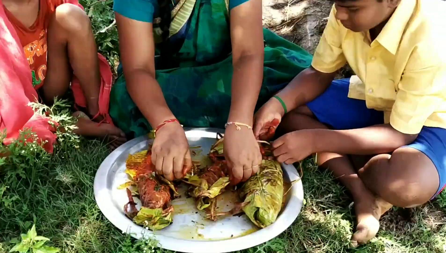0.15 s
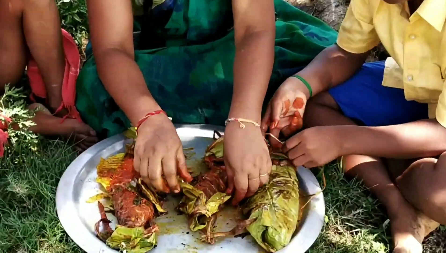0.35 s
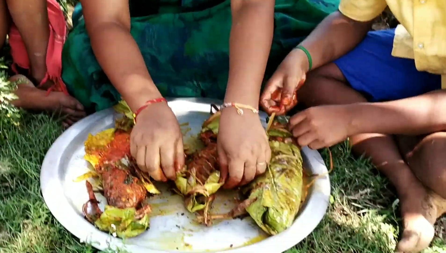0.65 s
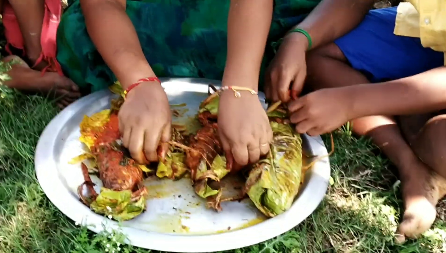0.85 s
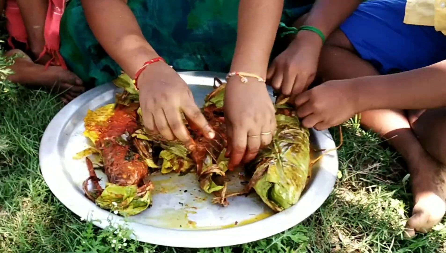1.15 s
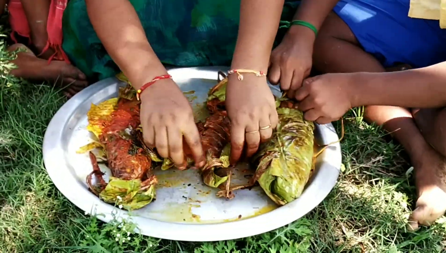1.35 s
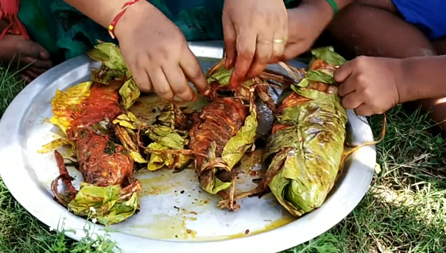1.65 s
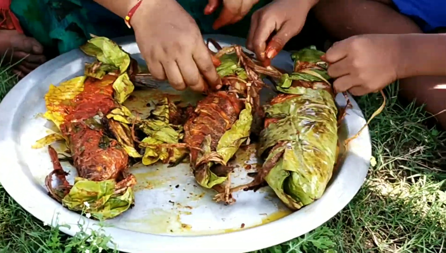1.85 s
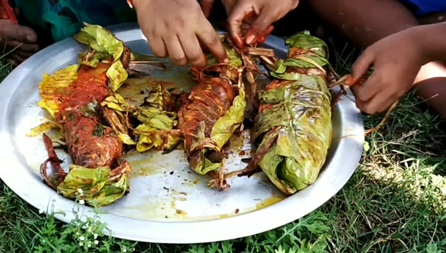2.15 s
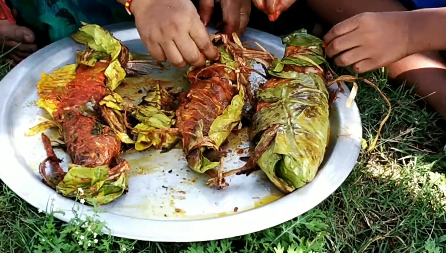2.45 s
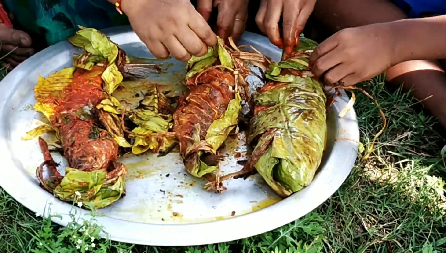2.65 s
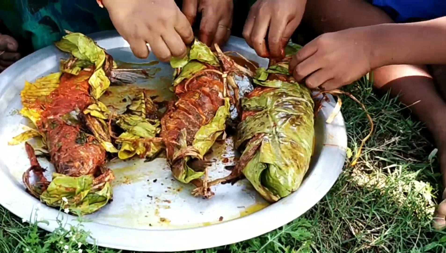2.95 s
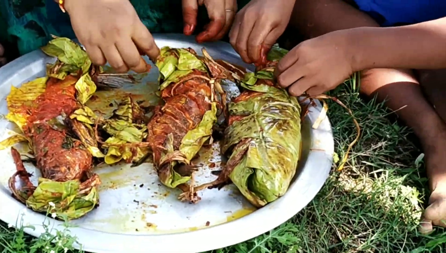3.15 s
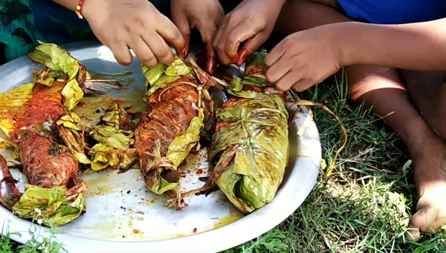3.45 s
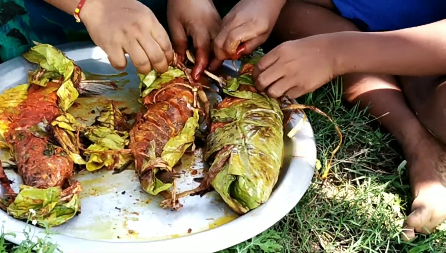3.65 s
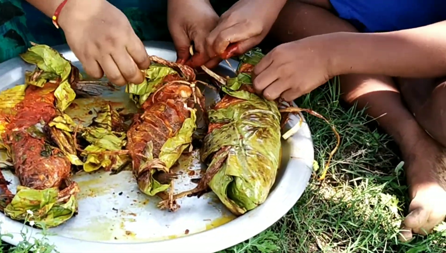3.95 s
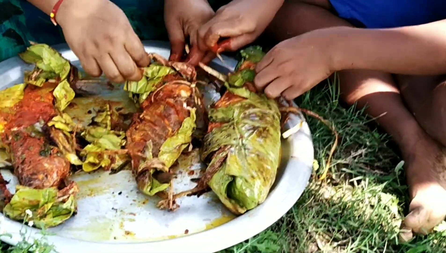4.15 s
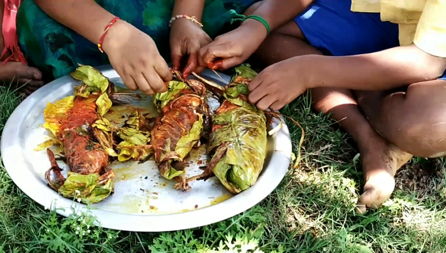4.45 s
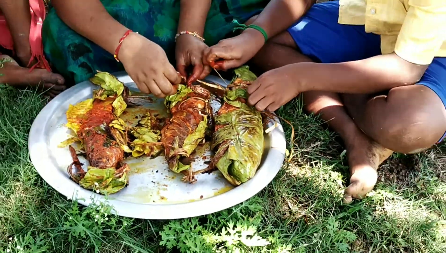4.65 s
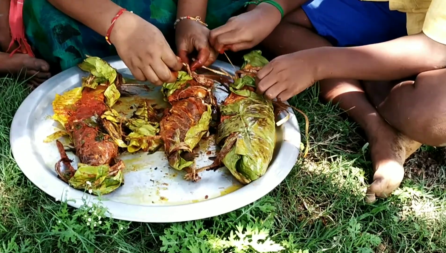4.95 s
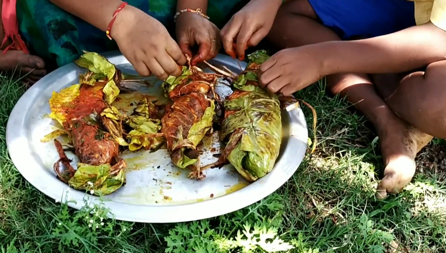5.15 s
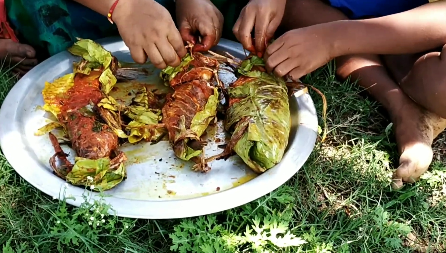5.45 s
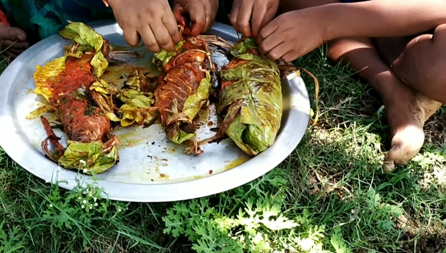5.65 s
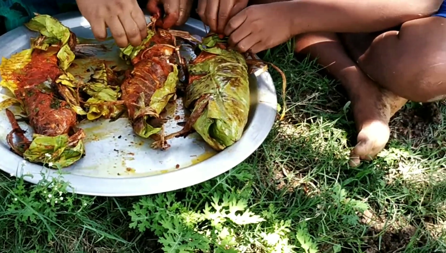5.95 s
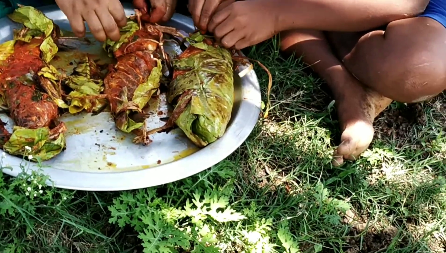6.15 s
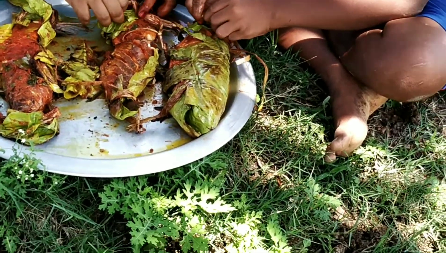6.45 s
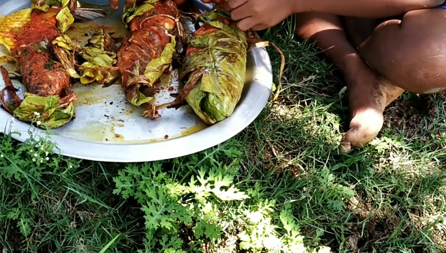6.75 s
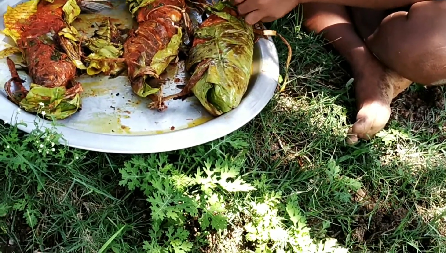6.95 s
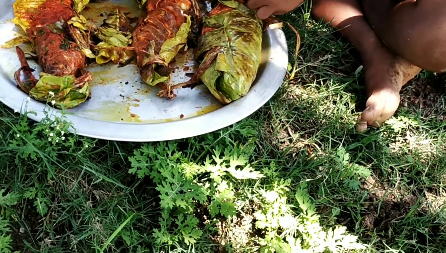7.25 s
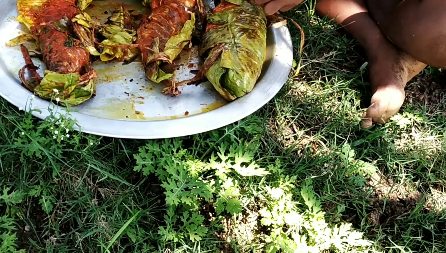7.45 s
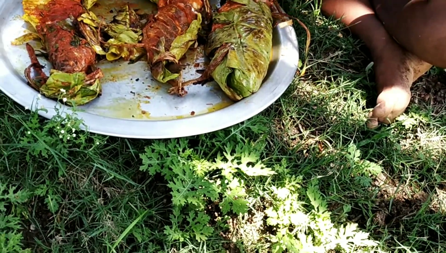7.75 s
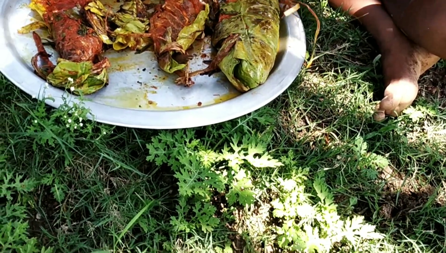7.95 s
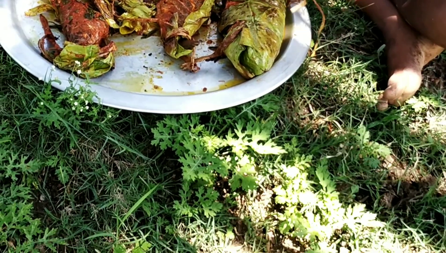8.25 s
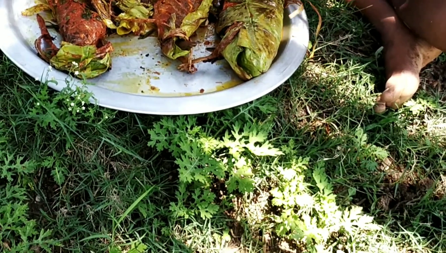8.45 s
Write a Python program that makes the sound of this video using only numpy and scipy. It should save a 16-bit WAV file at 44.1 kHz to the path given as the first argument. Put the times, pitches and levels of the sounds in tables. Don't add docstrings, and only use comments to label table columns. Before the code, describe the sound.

Outdoors on grass, a nearby cricket to the left gives short ringing trills about every 0.4 seconds, pausing slightly longer around six seconds. Low wind buffets a hand-held stereo microphone, growing strongest near seven seconds. Finger knocks and brief rubs hit its left side early, at four seconds and near the end. Small leaf snaps, faint bird whistles and distant crows sit over soft rustle and hiss.

```python
import sys
import numpy as np
from scipy import signal
from scipy.fft import rfft, irfft, next_fast_len
from scipy.io import wavfile
from scipy.ndimage import uniform_filter1d

SR = 44100
rng = np.random.default_rng(int(sys.argv[2]) if len(sys.argv) > 2 else 0)


def store_pcm(level_fs):
    pcm = np.round(np.clip(level_fs, -1, 1) * 32767).astype(np.int16)
    wavfile.write(sys.argv[1], SR, np.atleast_2d(pcm).T)


def attenuation_scalar(level_db):
    decades = np.asarray(level_db, float) / 20
    return 10 ** decades


N = 380009


def shaped(points, size):
    hz, db = np.transpose(points)
    fast = next_fast_len(size)
    bins_hz = np.arange(fast // 2 + 1) * SR / fast + 1e-3
    gain = attenuation_scalar(np.interp(np.log(bins_hz), np.log(hz), db))
    x = irfft(rfft(rng.standard_normal(fast)) * gain, fast)[:size]
    return x / x.std()


def walk(rate_hz, size=N):
    k = int(SR / rate_hz)
    held = np.repeat(rng.standard_normal(size // k + 1), k)
    return 1.64 * uniform_filter1d(uniform_filter1d(held, k), k)[:size]


def band(x, low_hz, high_hz, order=2):
    return signal.lfilter(*signal.butter(order, [low_hz, min(high_hz, .45 * SR)], "band", fs=SR), x)


def add(out, s, sound):
    i = int(s * SR)
    sound = sound[..., :N - i]
    out[..., i:i + sound.shape[-1]] += sound


def sides(left_db, right_db):
    return attenuation_scalar(np.array([[left_db], [right_db]]))


def field():
    # (frequency [Hz], left density [dB], right density [dB])
    spectrum = [(104, 5.5, 1), (437, 6, 3), (1310, -2.5, -1), (2000, -1, 1), (8000, -1.5, -4.5),
                (12000, -10, -8), (15500, -10.5, -15.5), (16000, -50, -47)]
    # (time [s], level [dB])
    rustle = [(0, -67.5), (1.8, -68), (3.0, -70.5), (6.0, -70.5), (8.62, -69.5)]
    stir_db = np.interp(np.arange(N) / SR, *np.transpose(rustle))
    out = np.zeros((2, N))
    for port in range(2):
        rest = shaped(np.array(spectrum)[:, [0, port + 1]], N)
        for top_hz in [1200, 2400, 4200, 6500, 9000, 12000]:
            low_pass = signal.butter(2, top_hz, fs=SR)
            low = signal.lfilter(*low_pass, rest)
            octave = signal.lfilter(*low_pass, low[::-1])[::-1]
            out[port] += octave * attenuation_scalar(2.0 * walk(13))
            rest = rest - octave
        out[port] += rest * attenuation_scalar(1.0 * walk(23))
        out[port] *= attenuation_scalar(stir_db + .5 * walk(1.52) + 9.5)
    return out


def whistles():
    # (time [s], length [s], start [Hz], end [Hz], near-port level [dB])
    right_bird = [(2.69, .055, 2750, 2300, -61), (3.063, 0.055, 2680, 2350, -60),
                  (3.46, 0.068, 2620, 1800, -61), (3.665, 0.06, 2540, 1900, -61),
                  (3.855, 0.052, 2490, 2150, -63), (4.049, 0.058, 2580, 2100, -61),
                  (4.13, 0.1, 2850, 2920, -70), (4.25, 0.056, 2540, 2250, -65),
                  (4.45, 0.03, 2570, 2400, -68), (6.95, .1, 1720, 1800, -73)]
    # (time [s], length [s], start [Hz], end [Hz], near-port level [dB])
    left_bird = [(4.885, 0.085, 3980, 4350, -71.5), (8.272, .08, 1900, 2300, -68),
                 (8.37, 0.03, 2350, 2680, -65), (8.4, .045, 2480, 2640, -66), (8.555, .04, 1950, 1800, -70)]
    right_shadow_db, left_shadow_db, swoop_hz = -15, -7, 171
    out = np.zeros((2, N))
    placed = [(row, sides(right_shadow_db, 0)) for row in right_bird]
    placed += [(row, sides(0, left_shadow_db)) for row in left_bird]
    for (s, length, start_hz, end_hz, db), place in placed:
        u = np.arange(int(length * SR)) / (length * SR)
        falling = end_hz < start_hz
        pitch_hz = start_hz + (end_hz - start_hz) * u ** (3.5 if falling else .7)
        pitch_hz += swoop_hz * (np.exp(-u / .15) - .6) * falling
        pitch_hz += 15 * walk(98, len(u))
        tone = np.sin(2 * np.pi * np.cumsum(pitch_hz) / SR)
        envelope = np.sin(np.pi * u) ** 0.1 * (1 - 0.13 * u ** 2)
        add(out, s, 1.35 * tone * envelope * attenuation_scalar(db) * place)
    return out


def caws():
    # (time [s], length [s], throat resonance [Hz], left level [dB], right level [dB])
    crow_calls = [(0.449, 0.21, 2050, -86, -60.5), (2.133, 0.22, 2790, -78, -65),
                  (2.453, 0.14, 1637, -76, -67), (2.42, 0.2, 1180, -75, -76), (2.55, 0.14, 2080, -74, -66),
                  (3.224, 0.067, 1910, -75, -64), (5.189, 0.23, 2190, -82, -66),
                  (5.19, 0.12, 1790, -82, -66), (5.699, 0.17, 2010, -83, -66),
                  (5.721, 0.14, 1500, -86, -76), (6.683, 0.16, 1735, -78, -71),
                  (7.241, 0.16, 1720, -78, -68), (8.49, 0.092, 1870, -72, -77),
                  (4.38, 0.14, 1250, -77, -79)]
    out = np.zeros((2, N))
    for s, length, throat_hz, left_db, right_db in crow_calls:
        u = np.arange(int(length * SR)) / (length * SR)
        bend = 1 + .05 * np.sin(np.pi * u ** .5) - .05 * u + .03 * walk(70, len(u))
        phase = np.cumsum(throat_hz / 4 * bend) / SR
        harmonics = sum(np.sin(2 * np.pi * k * phase) for k in range(1, 7))
        buzz = harmonics + 6 * rng.standard_normal((2, len(u)))
        caw = band(buzz, .88 * throat_hz, 1.1 * throat_hz)
        add(out, s, .85 * caw / caw.std() * np.sin(np.pi * u) ** .6 * sides(left_db, right_db))
    return out


def birds():
    decay = np.exp(-np.arange(4000) / (.025 * SR))
    trees = attenuation_scalar(-29) * rng.standard_normal((2, 4000)) * decay
    trees[:, 0] = 1
    return signal.fftconvolve(whistles() + caws(), trees, axes=1)[:, :N]


def wind():
    # (time [s], left level [dB], right level [dB], turbulence [dB])
    breeze = [(0, -41, -48.5, 4.5), (.42, -46, -49.5, 0), (.75, -40.5, -55, -4), (1.2, -47, -46, 1),
              (1.55, -49.5, -51.5, -1), (2.05, -43, -46, -7.5), (2.4, -50, -52.5, 2), (3.0, -40.5, -44, -1),
              (3.6, -44, -49.5, 8), (4.25, -37.5, -47, -0.5), (4.95, -43, -51, 3.5), (5.5, -43, -48, 4.5),
              (6.2, -40, -44, 0.5), (6.9, -31, -35, 3.5), (7.2, -26, -36.5, 2), (7.55, -42.5, -46, -4),
              (7.97, -31.5, -35.5, -4.5), (8.62, -47, -43.5, -2.5)]
    # (time [s], half length [s], port [0 left, 1 right], rise over breeze [dB])
    puffs = [(0.607, 0.093, 1, 11), (1.01, 0.038, 1, 9), (1.212, 0.29, 0, 3), (2.082, 0.1, 0, 6),
             (2.51, 0.12, 0, 1.5), (2.805, 0.3, 0, 2.5), (2.917, 0.14, 0, -9.5), (3.395, 0.23, 1, 10),
             (3.513, 0.073, 1, -22), (3.944, 0.05, 0, 5.5), (4.525, 0.082, 1, 1), (5.15, 0.11, 0, 2),
             (5.12, 0.066, 1, 8), (5.612, 0.11, 1, 13), (5.797, 0.14, 0, 1.5), (6.065, 0.1, 1, 8.5),
             (6.51, 0.073, 0, 5.5), (6.49, 0.35, 1, 2.5), (6.88, 0.055, 1, 10), (7.026, 0.068, 0, 0.5),
             (6.994, 0.2, 1, -5), (7.139, 0.13, 0, -9), (7.999, 0.1, 1, 10.5), (8.095, 0.17, 1, -6),
             (8.388, 0.22, 1, -10), (8.59, 0.23, 1, 8.5)]
    shelter_db, gusty_db, patchy_db = (0, -6), (1, 2.5), (3.5, 5)
    calm_flutter_db, calm_db = (-55, -64), -42
    flutter_per_db, puff_flutter_per_db = 1.3, 1.5
    s, *levels = np.transpose(breeze)
    t = np.arange(N) / SR
    *breeze_db, turbulence_db = [np.interp(t, s, c) for c in levels]
    puff_db = np.zeros((2, N))
    for mid, length, port, db in puffs:
        add(puff_db[round(port)], mid - length, db * np.hanning(int(2 * length * SR)))
    out = np.zeros((2, N))
    for port in range(2):
        shelter = shelter_db[port]
        rumble = shaped([(20, 2.0), (40, 1.5), (70, 4.0), (110, -3.0 + shelter / 2),
                         (160, -11.5 + shelter), (260, -30.5), (400, -63.5)], N)
        flutter = shaped([(90, -25), (140, -1.0), (190, -2), (300, -11.5), (450, -23.0),
                          (700, -35.0), (1200, -59.5)], N)
        out[port] = rumble * attenuation_scalar(breeze_db[port] + puff_db[port] + 6.5 + gusty_db[port] * walk(13))
        flutter_db = calm_flutter_db[port] + flutter_per_db * (breeze_db[port] - calm_db) + turbulence_db
        flutter_db += puff_flutter_per_db * puff_db[port] + 1.6
        out[port] += flutter * attenuation_scalar(flutter_db + patchy_db[port] * np.minimum(walk(30), 2))
    return out


def wind_pops():
    # (time [s], port [0 left, 1 right], level [dB])
    bursts = [(6.152, 1, -40), (6.292, 1, -37.5), (0.179, 0, -36.5), (0.686, 0, -36), (0.955, 0, -49),
              (1.237, 0, -38), (2.52, 0, -43), (3.307, 1, -40), (3.813, 0, -37.5), (3.906, 1, -45),
              (4.472, 0, -53), (4.547, 1, -44), (5.654, 1, -39.5), (5.808, 0, -37.5), (6.064, 1, -58),
              (6.085, 1, -37.5), (6.104, 0, -34.5), (6.357, 1, -21.5), (6.522, 1, -32), (6.853, 1, -23.5),
              (6.955, 1, -33), (6.991, 0, -32), (7.139, 1, -24), (7.214, 1, -28), (7.558, 0, -34),
              (7.798, 1, -31.5), (7.898, 1, -44), (7.952, 1, -36), (8.032, 1, -30.5), (8.193, 1, -45),
              (8.243, 0, -38), (8.387, 0, -41)]
    out = np.zeros((2, N))
    u = np.linspace(-3, 3, int(0.0087 * SR))
    for s, port, db in bursts:
        add(out[round(port)], s - .0045, -u * np.exp(-u ** 2) * attenuation_scalar(db + 12.5))
    return out


def crinkles():
    # (time [s], length [s], level [dB], left minus right [dB], pitch [Hz])
    crumples = [(1.329, .02, -63, -8, 11500), (1.338, .03, -65, 0, 3200), (1.362, .006, -62, -8, 11500),
                (1.383, .02, -65, -6, 12500), (1.488, .022, -60, -3, 8460), (1.49, .02, -63, 0, 3000),
                (2.0525, 0.0061, -48.5, -7, 10900), (5.935, .016, -63, -2, 6500),
                (5.939, .016, -67, -2, 3500), (6.057, .006, -66, 0, 8000), (6.093, .005, -71, 0, 2180),
                (6.153, 0.0099, -65, -5, 885), (6.183, .009, -61.5, -2, 7000), (6.203, 0.022, -64, 2, 3200),
                (0.099, .005, -62, 8, 2200), (0.052, 0.0043, -55, 5, 2180)]
    out = np.zeros((2, N))
    for s, length, db, pan_db, hz in crumples:
        size = int(length * SR)
        grains = rng.standard_normal((2, 2000))[:, :size] * attenuation_scalar(4 * walk(900, 2000)[:size])
        sound = band(grains * np.sqrt(np.hanning(size)), .75 * hz, 1.25 * hz)
        add(out, s, sound / sound.std() * attenuation_scalar(db) * sides(pan_db / 2, -pan_db / 2))
    return out


def snaps():
    # (time [s], peak level [dB], left minus right
    # [dB], body re peak [dB], pitch [Hz])
    ticks = [(0.0739, -42.5, 2, -6, 4640), (0.0755, -48, 3, -6, 4300), (0.8777, -55, 8, 4, 9000),
             (.8785, -62, 9, -10, 13000), (.8786, -58, 9, -10, 4200), (.8832, -50, 2, -14, 5800),
             (0.913, -63, -2, 12, 2200), (8.3546, -50, 24, -23, 12500), (.3515, -53, 25, -22, 5860),
             (.353, -44, 32, -24, 3620), (.3548, -55, 17, -10, 9500), (4.0828, -66, 12, -20, 9000),
             (1.687, -60, 0, -10, 3600), (1.2595, -62, -3, -5, 8800), (1.642, -44.5, -12.5, -3, 12000),
             (1.6412, -38, 0, -10, 5030), (1.886, -61.5, 1, 16.5, 3000), (3.242, -61, -8, -17, 7600),
             (3.7074, -72, -2, 0, 3200), (3.998, -60, -4, -14, 10000), (5.894, -67, -6, 8, 5200),
             (6.6694, -75, 3, -1, 4000), (6.733, -60, 6, -8, 8000), (7.298, -56, 3, -7, 2980),
             (7.9904, -69, 2, -2, 3000)]
    out = np.zeros((2, N))
    t = np.arange(int(0.029 * SR)) / SR
    envelope = np.exp(-((t - .001) / 0.00079) ** 2) + 0.1 * np.exp(-t / 0.008)
    for s, db, pan_db, body_db, hz in ticks:
        noise = rng.standard_normal((2, 2, len(t))) * envelope
        top = band(noise[0], 0.84 * hz, 1.26 * hz) * attenuation_scalar(13.0)
        body = band(noise[1], 350, 2000, order=1) * attenuation_scalar(body_db + 12.0)
        add(out, s, (top + body) * attenuation_scalar(db) * sides(pan_db / 2, -pan_db / 2))
    return out


def palm_rubs():
    # (time [s], length [s], level [dB], top [Hz])
    slides = [(0.359, 0.039, -46, 2000), (8.359, 0.043, -44.5, 6000), (0, 0.057, -51.5, 3000),
              (0.049, 0.088, -60, 3000), (0.824, 0.12, -61, 3000), (1.047, 0.12, -53.5, 3000),
              (1.198, 0.12, -54, 2400), (2.051, 0.043, -49.5, 2950), (2.099, 0.012, -55, 2000),
              (4.077, 0.36, -57.5, 3000), (5.771, 0.15, -59.5, 1500), (6.654, 0.11, -62, 2000),
              (6.973, 0.24, -64, 2500), (7.939, 0.15, -61.5, 2000), (6.079, 0.11, -57, 890),
              (7.207, 0.066, -57, 800)]
    out = np.zeros((2, N))
    for s, length, db, top_hz in slides:
        size = int(length * SR)
        rub = shaped([(200, -6), (500, 0), (top_hz, -9), (2 * top_hz, -25)], size)
        add(out[0], s, rub * attenuation_scalar(db + 2.5 * walk(60, size)) * np.sqrt(np.hanning(size)))
    return out


def finger_pulls():
    # (time [s], level [dB])
    peels = [(.3556, -12), (8.3566, -19), (2.0776, -32), (1.0962, -28)]
    out = np.zeros((2, N))
    t = np.arange(int(.12 * SR)) / SR
    suction = -(1 - np.exp(-(t / 0.0003) ** 2)) * np.exp(-(t / 0.0022) ** 2)
    for s, db in peels:
        add(out[0], s, suction * attenuation_scalar(db))
    return out


def knocks():
    # (time [s], crack [dB], bright crack [dB], push [dB], thump [dB])
    hits = [(.016, -37.5, -70, -48.5, -45), (0.064, -40, -58, -32, -21), (.271, -64, -67, -35.5, -55),
            (0.3537, -25, -39, -20, -47), (0.3550, -30, -39, -16, -29), (0.405, -51, -68, -29, -50),
            (0.856, -50, -55, -28.5, -54), (1.0914, -35, -71, -23, -10), (1.0927, -42, -70, -23.5, -42),
            (1.0953, -28, -75, -17, -46), (1.1163, -32.5, -69, -19.5, -14), (2.073, -57, -75, -32, -50),
            (2.077, -33.5, -62, -26, -23), (2.112, -44, -70, -28, -42), (4.0704, -30, -51, -15.5, -20),
            (4.0717, -37, -60, -19, -9.5), (4.075, -44, -75, -33, -40), (5.51, -45, -80, -31, -77),
            (8.3557, -24, -40, -33, -38), (8.3558, -17, -21, -18, -17.5), (8.373, -42, -40, -43, -26)]
    lean_in_s, lean_in_rise_s = .004, .0009
    out = np.zeros((2, N))
    t = np.arange(int(.12 * SR)) / SR
    before = np.arange(-int(lean_in_s * SR), 0) / SR
    push_shape = (1 - np.exp(-(t / 0.00028) ** 2)) * np.exp(-(t / 0.0016) ** 2)
    swing = np.sin(2 * np.pi * 66 * t) * np.exp(-t / 0.0091)
    lift_off = 1 + np.exp((t - .04) / 0.0026)
    for s, crack_db, bright_db, push_db, thump_db in hits:
        scrape_db = (crack_db + bright_db) / 2 - 9
        noise = rng.standard_normal((3, len(t)))
        noise[:2, 0] = 9
        push = push_shape * attenuation_scalar(push_db)
        thump = swing * attenuation_scalar(thump_db)
        dull = band(noise[0] * np.exp(-t / 0.0019), 300, 1640, order=1)
        crack = band(dull, 154, 3900) * attenuation_scalar(crack_db + 7.0)
        bright = band(noise[1] * np.exp(-t / .0005), 3200, 12000) * attenuation_scalar(bright_db + 7)
        rough = band(noise[2], 160, 4100) * attenuation_scalar(scrape_db)
        rough += band(noise[2], 2300, 9900) * attenuation_scalar(bright_db - 12.5)
        scrape = rough * attenuation_scalar(-160 * t + 1.9 * walk(410, len(t))) / lift_off
        grit = band(rng.standard_normal(len(before)), 430, 3000)
        grit *= attenuation_scalar(crack_db / 4 + 0.93 * bright_db + 14.0) * np.minimum(-before / 0.00062, 1)
        add(out[0], s - lean_in_s, grit * np.exp(before / lean_in_rise_s))
        add(out, s, (push + thump + crack + bright + scrape) * sides(0, -50))
    return out


def cricket():
    # (last stroke [s], pause before it [ms], left level [dB], right level [dB])
    chirps = [(0.2785, 22, -50.1, -60.5), (0.7015, 21.5, -48.9, -58.4), (1.1015, 20, -45.9, -54.7),
              (1.4985, 21.5, -49.7, -54.4), (1.9245, 21, -48.0, -54.9), (2.379, 19.5, -50.4, -56.4),
              (2.7715, 18.5, -52.1, -56.9), (3.1655, 22, -52.3, -56.9), (3.545, 21.5, -53.7, -56.5),
              (3.9655, 20.5, -54.2, -58.8), (4.387, 20.5, -50.7, -60.9), (4.777, 24, -51.6, -60.0),
              (5.1595, 23.5, -51.7, -57.7), (5.656, 23, -55.2, -55.4), (6.4635, 24.5, -53.2, -58.3),
              (6.8685, 24, -50.5, -56.4), (7.2655, 22, -49.3, -56.0), (7.6815, 22, -50.8, -58.8),
              (8.0585, 21.5, -49.6, -54.8), (8.423, 19.5, -48.3, -55.5)]
    # (time before the last but one [s], level [dB], length [s])
    strokes = [
        (0, 0, .0115),
        (0, 0, .011),
        (.0155, -2.5, .0098),
        (.029, -3, .0092),
        (.042, -4.5, .0085),
        (.054, -7, .008),
        (.0655, -10, .0075),
        (.0765, -18, .006),
    ]
    # (delay [s], left level [dB], right level [dB])
    echoes = [(.0045, -17, -7), (.011, -17, -7), (.021, -14, -6), (.029, -16, -8), (.042, -21, -15)]
    # (left [dB], right [dB])
    echo_shifts = [(13, 5), (4, 8), (2, -5), (0, -1), (0, -3), (4, -1), (1, 3), (-5, 10), (1, -17), (3, 4),
                   (4.5, 4), (8, 0), (6.5, 0), (11, -6), (4, 9), (6, 18), (11, 0), (15, -18), (8.5, -2),
                   (9.5, -1)]
    wing_hz, wing_fall_hz, warmup_hz_per_stroke = 6070, 530, 22
    overtone_db = (-33, -18)
    tempo_scatter, lead_s = .008, .12
    tail = np.arange(int(.1 * SR))
    out = np.zeros((2, N))
    for (end, pause_ms, *levels), shift_db in zip(chirps, echo_shifts):
        pause, stretch = pause_ms / 1000, 1 + tempo_scatter * rng.standard_normal()
        chirp = np.zeros((2, int(.14 * SR)))
        for k, (before, db, length) in enumerate(strokes):
            u = np.arange(int(length * SR)) / (length * SR)
            pitch_hz = wing_hz + warmup_hz_per_stroke * (2 - k) - wing_fall_hz * u
            pitch_hz += 25 * rng.standard_normal()
            phase = 2 * np.pi * (np.cumsum(pitch_hz) / SR + rng.random())
            envelope = np.sin(np.pi * u ** .7) ** .8 * attenuation_scalar(db + 1.2 * rng.standard_normal())
            start = lead_s - (k > 0) * (pause + before * stretch) - .44 * length
            add(chirp, start, np.sin([phase, 2 * phase]) * envelope)
        tone = band(chirp[0], 5350, 6300, order=1)
        for port, db in enumerate(levels):
            scatter_db = -42 + 6 * port + shift_db[port]
            path = attenuation_scalar(scatter_db) * rng.standard_normal(len(tail)) * np.exp(-tail / (.03 * SR))
            path[17 * (1 - port)] = 1
            for delay, *echo_db in echoes:
                bounce_db = echo_db[port] - 4 + shift_db[port] + 3 * rng.standard_normal()
                path[int((delay + .003 * rng.random()) * SR)] = attenuation_scalar(bounce_db)
            heard = signal.fftconvolve(tone + attenuation_scalar(overtone_db[port]) * chirp[1], path)
            loud_part = heard[int(.03 * SR):int(.13 * SR)]
            add(out[port], end - lead_s, heard * attenuation_scalar(db + 1.7) / loud_part.std())
    return out


def scene():
    background = field() + birds() + wind() + wind_pops()
    handling = palm_rubs() + finger_pulls() + knocks()
    return background + crinkles() + snaps() + handling + cricket()


def thin(x):
    # (frequency [Hz], share of quiet bands [0-1])
    dropped = [(700, 0), (1100, .03), (2000, .01), (3500, .025), (6000, .02), (8500, .05), (10000, .24),
               (13000, .28)]
    hz, _, spec = signal.stft(x, SR, "cosine", 2048)
    wide = 12
    tile = np.arange(len(hz)) // wide
    power = uniform_filter1d(abs(spec).max(0), wide, axis=0)
    quiet = power < 1.3 * np.median(power, axis=1, keepdims=True)
    luck = uniform_filter1d(rng.standard_normal((tile[-1] + 1, spec.shape[2])), 3)[tile]
    chance = luck.argsort().argsort() / spec.shape[2]
    empty = quiet & (chance < np.interp(hz, *np.transpose(dropped))[:, None])
    return signal.istft(spec * ~empty, SR, "cosine", 2048)[1][:, :N]


def dull_treble(x):
    # (from [s], to [s], share of the top lost [0-1])
    spells = [(1.08, 1.18, 1), (4.08, 4.13, 1), (7.16, 7.38, 1), (7.38, 7.48, .8), (7.52, 7.82, .5),
              (7.82, 8.2, 1), (8.2, 8.33, .6)]
    top = signal.sosfiltfilt(signal.butter(8, 13800, "high", fs=SR, output="sos"), x)
    t = np.arange(N) / SR
    lost = sum(share * ((t > start) & (t <= end)) for start, end, share in spells)
    return x - top * uniform_filter1d(lost.astype(float), 900)


def top_cut(x):
    return signal.sosfilt(signal.butter(12, 15750, fs=SR, output="sos"), x)


def record(dry):
    low_cut = signal.cheby1(4, 1.5, 47.9, "high", fs=SR, output="sos")
    mic = dull_treble(thin(signal.sosfilt(low_cut, dry)))
    t = np.arange(N) / SR
    mic = mic * np.minimum((t[-1] - t) / .004, 1)
    return top_cut(mic)


dry = scene()
out = record(dry)
store_pcm(out)
```